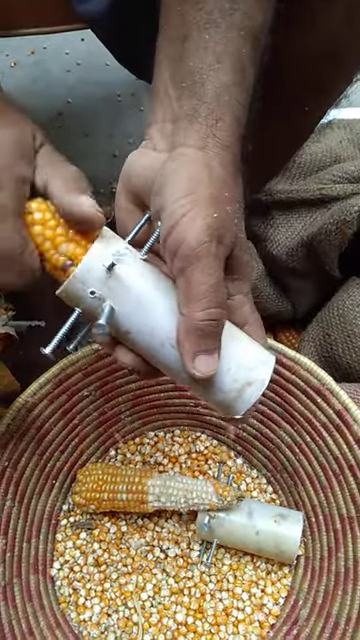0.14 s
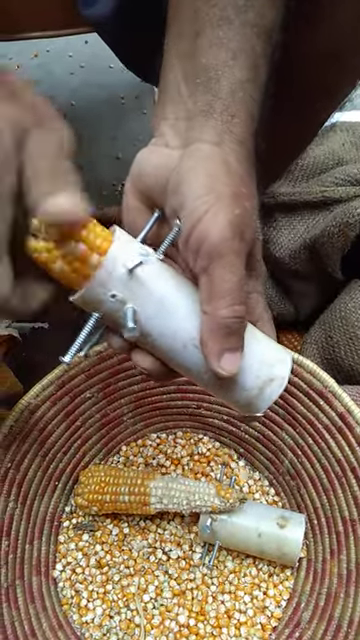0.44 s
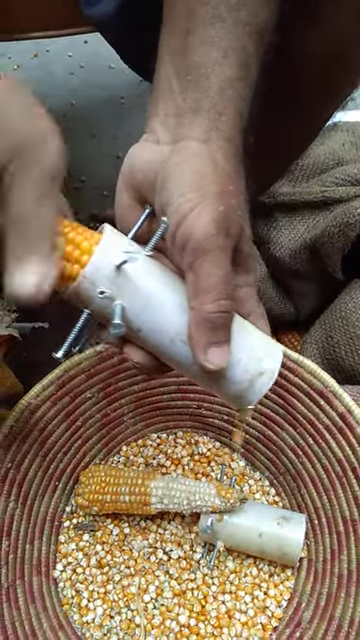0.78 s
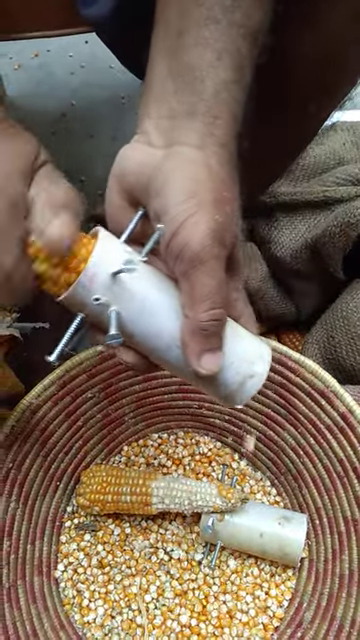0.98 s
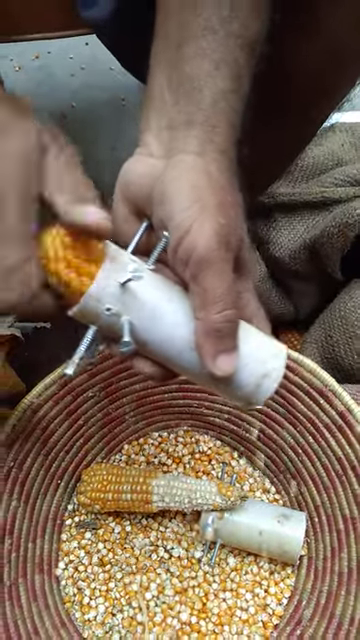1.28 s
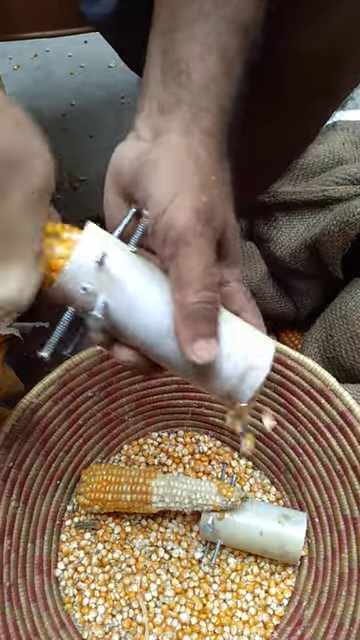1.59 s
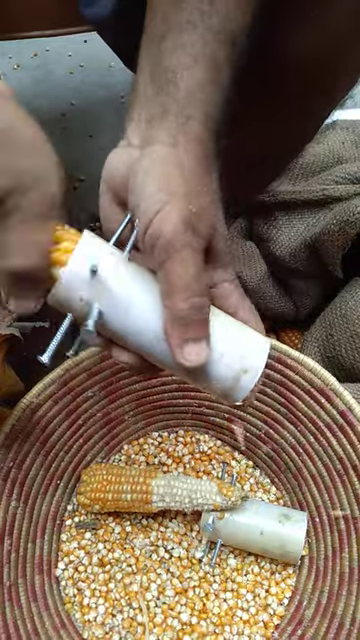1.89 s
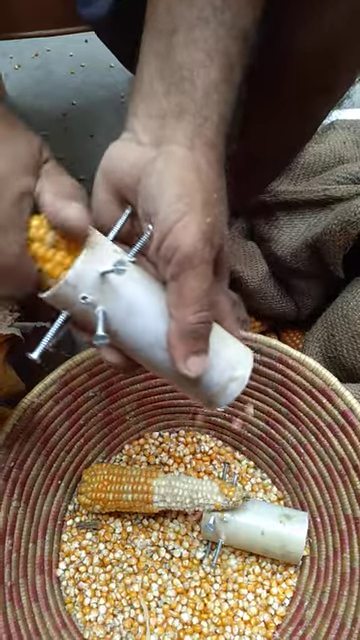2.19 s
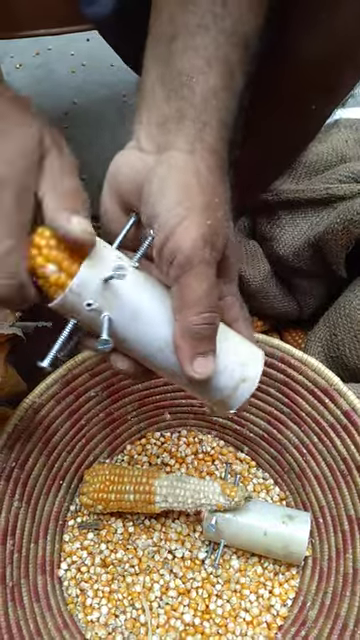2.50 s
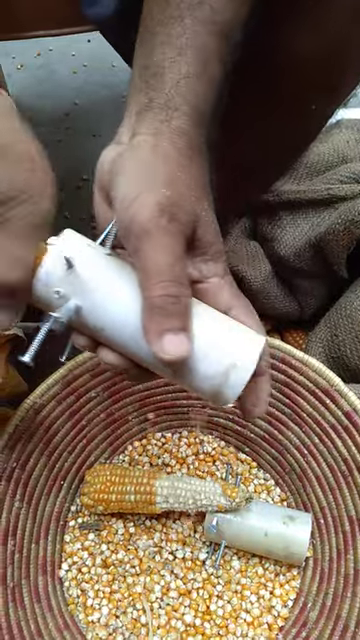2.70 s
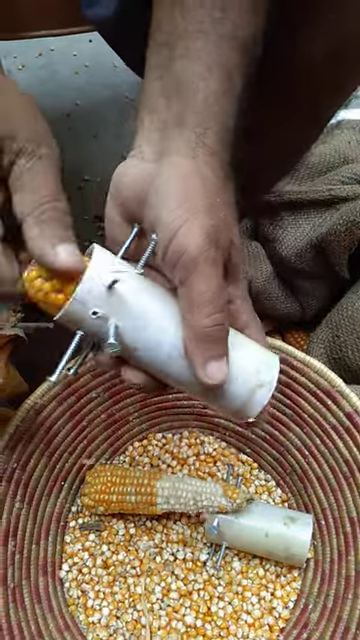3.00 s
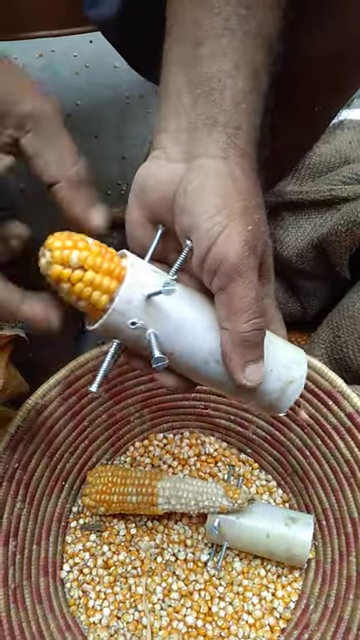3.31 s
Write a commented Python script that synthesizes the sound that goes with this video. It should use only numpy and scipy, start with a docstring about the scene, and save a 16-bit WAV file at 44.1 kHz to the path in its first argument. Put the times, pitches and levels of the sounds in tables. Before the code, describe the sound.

Dry corn kernels snap off a cob wrung in short twists through a plastic pipe with nails; crunches, bright ticks, small metallic pings and soft basket plops, close microphone, small room.

```python
"""A rustle and a faint, sagging low tone come first, then kernels crack off a dry corn cob, close to the microphone.
The cob is wrung in short twists through a plastic pipe studded with nails, in a small room.
Snaps, ticks and basket plops are noise bursts, the crunch and rustle are random grains with hiss,
and the pinging nails, low tone and late thin whistle are sines. Resonances colour snaps, ticks and crunch."""
import sys
import numpy as np
from scipy import signal
from scipy.fft import rfft, irfft
from scipy.io import wavfile
from scipy.ndimage import uniform_filter1d

SR = 44100
rng = np.random.default_rng(int(sys.argv[2]) if len(sys.argv) > 2 else 0)


def int16_out(signal):
    """Quantize to a 16-bit WAV file."""
    q = np.round(np.clip(np.atleast_2d(signal).T, -1, 1) * 32767)
    wavfile.write(sys.argv[1], SR, q.astype(np.int16))


N = 152145

# spectrum of dry corn against the nails, for crunch and ticks: frequency_hz, level_db
CRUNCH_COLOUR = [(50, -64.5), (220, -19), (480, -22), (850, -16), (1700, -12.5), (3300, -3.5), (5700, -2),
                 (8500, 2.5), (11000, -1.5), (15500, -5.5)]
# edges of the neighbouring bands for grains and room: edge_hz
BAND_EDGES_HZ = (30, 400, 900, 1350, 2300, 3500, 5000, 7000, 9500, 12500, 19000)
HIT_SIZE = 2048   # samples in one short sound


def from_db(db):
    """Decibels to gain."""
    return 10 ** (np.asarray(db) / 20)


def rms_one(x):
    """Scale to unit rms."""
    return x / np.sqrt(np.mean(x ** 2) + 1e-20)


def add(out, s, sound):
    """Mix a short sound in at a given time in seconds."""
    start = max(int(s * SR), 0)
    out[start:start + len(sound)] += sound[:max(len(out) - start, 0)]


def band(x, low_hz, high_hz):
    """Band-pass."""
    return signal.sosfilt(signal.butter(3, [low_hz, high_hz], "band", fs=SR, output="sos"), x)


def coloured(x, colour):
    """Causal (minimum-phase) filter with the given spectrum, along the last axis."""
    hz, db = np.transpose(colour)
    grid = np.maximum(np.arange(HIT_SIZE // 2 + 1) * SR / HIT_SIZE, 1)
    gain = from_db(np.interp(np.log(grid), np.log(hz), db))
    # folding the cepstrum onto positive time gives the minimum phase
    cepstrum = irfft(np.log(gain))
    cepstrum[1:HIT_SIZE // 2] *= 2
    cepstrum[HIT_SIZE // 2 + 1:] = 0
    kernel = irfft(np.exp(rfft(cepstrum)))
    if x.ndim > 1:
        kernel = kernel[None]
    return signal.fftconvolve(x, kernel, axes=-1)[..., :x.shape[-1]]


def resonate(x, modes):
    """The plain sound plus the two-pole resonances that it excites."""
    out = x
    for hz, width_hz, db in modes:
        r = np.exp(-np.pi * width_hz / SR)
        poles = [1, -2 * r * np.cos(2 * np.pi * hz / SR), r * r]
        ringing = signal.lfilter([1, 0, -1], poles, x)
        out = out + from_db(db) * (1 - r * r) / 2 * ringing
    return out


def fractures(count, decay_s):
    """One row per hit: a sharp crack and a quickly dying splintering, both of noise."""
    crack_decay_s, crack_db = 0.00072, 3.5
    t = np.arange(HIT_SIZE) / SR
    envelope = np.exp(-t / decay_s) + from_db(crack_db) * np.exp(-t / crack_decay_s)
    return rng.standard_normal((count, HIT_SIZE)) * envelope


def kernel_hits(count, decay_s):
    """Fractures coloured by the short resonances of each kernel, no two alike."""
    # a kernel rings once between each neighbouring pair: edge_hz
    pitch_edges = np.array((2500, 5130, 6790, 13110))
    width_hz, ring_db = 620, 2.5
    pitches = pitch_edges[:-1] + np.diff(pitch_edges) * rng.random((count, len(pitch_edges) - 1))
    hits = []
    for hit, own_pitches in zip(fractures(count, decay_s), pitches):
        hits.append(resonate(hit, [(hz, width_hz, ring_db) for hz in own_pitches]))
    return np.array(hits)


def placed(times, levels_db, hits):
    """Lay the hits out in time; a level is the hit's energy spread over 5 ms."""
    out = np.zeros(N)
    for s, db, hit in zip(times, levels_db, hits):
        add(out, s, from_db(db) * hit * np.sqrt(.005 * SR / np.sum(hit ** 2)))
    return out


def crackle(per_s, spread_db):
    """Random tiny fractures, each with its own size and colour, evened over about 20 ms."""
    grain_decay_s, patchy_db = 0.003, 5.5   # each grain's bands differ by up to this, either way
    starts = rng.random(N) < per_s / SR
    sizes_db = spread_db * np.minimum(rng.exponential(1, N), 3)
    energy = starts * from_db(sizes_db) ** 2 + 1e-9
    dying = [1, -np.exp(-2 / (grain_decay_s * SR))]
    usual = uniform_filter1d(signal.lfilter([1], dying, energy), size=900)
    out = 0
    for low_hz, high_hz in zip(BAND_EDGES_HZ, BAND_EDGES_HZ[1:]):
        patchiness = from_db(patchy_db * 2 * (rng.random(N) - .5)) ** 2
        power = signal.lfilter([1], dying, energy * patchiness)
        evened = np.sqrt(power / (usual + 0.61 * usual.mean()))
        out = out + band(rng.standard_normal(N) * evened, low_hz, high_hz)
    return rms_one(out)


def room(x):
    """A short, diffuse tail: in each band the energy lingers in noise and dies away."""
    # spectrum of the tail: frequency_hz, level_db
    room_colour = [(500, -2.5), (1700, -3), (3200, -0.5), (9000, -4.5), (15500, -4)]
    room_db, t60_s = -10, 0.3
    t = np.arange(SR // 2) / SR
    decay = from_db(-60 * t / t60_s) ** 2
    out = 0
    for low_hz, high_hz in zip(BAND_EDGES_HZ, BAND_EDGES_HZ[1:]):
        energy = signal.fftconvolve(band(x, low_hz, high_hz) ** 2, decay / decay.sum())[:N]
        noise = rms_one(band(rng.standard_normal(N), low_hz, high_hz))
        out = out + np.sqrt(np.abs(energy)) * noise
    return from_db(room_db) * coloured(out, room_colour)


def whistle():
    """A thin, faint sine wavers in pitch, flickers in level and glides upward in the background."""
    # course of the whistle: time_s, pitch_hz, level_db
    whistle_course = [(3.285, 1390, -71), (3.321, 1375, -56), (3.45, 1496, -54)]
    waver_hz, flicker_db = 55, 4   # rms
    s, hz, db = np.transpose(whistle_course)
    t = np.arange(N) / SR
    waver, flicker = rms_one(band(rng.standard_normal((2, N)), 17, 110))
    pitch = np.interp(t, s, hz) + waver_hz * waver
    level = from_db(np.interp(t, s, db) + flicker_db * flicker)
    return (t > s[0]) * level * np.sqrt(2) * np.sin(2 * np.pi * np.cumsum(pitch) / SR)


def groan():
    """A soft, low sine sags in pitch and fades at the start."""
    start_hz, sag_hz_per_s, level_db, t60_s = 216, 1700, -56, 0.25
    t = np.arange(SR // 4) / SR
    pitch = np.maximum(start_hz - sag_hz_per_s * t, 0)
    level = from_db(level_db - 60 * t / t60_s)
    out = np.zeros(N)
    add(out, 0, level * np.sin(2 * np.pi * np.cumsum(pitch) / SR))
    return out


def rustle():
    """Fingers and husk on the pipe keep up a faint crackling hiss of grains and steady noise."""
    # loudness of the rustle: time_s, level_db
    rustle_levels = [(0, -40), (.15, -47), (.45, -42.5), (.85, -44.5), (.97, -53), (1.662, -43),
                     (1.72, -55), (2.08, -45.5), (2.5, -45.5), (2.85, -51.5), (3.45, -54.5)]
    # spectrum of the rustle: frequency_hz, level_db
    rustle_colour = [(40, -31), (110, -19.5), (240, -16.5), (500, -1), (1600, -1.5), (3600, 0.5),
                     (9000, 0.5), (15500, -3.5)]
    grains_per_s, spread_db, hiss_db = 300, 8, -7   # hiss relative to the grains
    grains = crackle(grains_per_s, spread_db) + from_db(hiss_db) * rng.standard_normal(N)
    level = from_db(np.interp(np.arange(N) / SR, *np.transpose(rustle_levels)))
    return level * rms_one(coloured(grains, rustle_colour))


def plops():
    """Kernels land softly on the heap in the woven basket: noise bursts, each with its own top."""
    # landings, dull and bright: start_s, level_db (before the trim), top_hz
    landing_events = [(0.111, -49, 3000), (0.172, -57.5, 1000), (0.217, -52.5, 1000), (0.566, -48.5, 3000),
                      (0.576, -54, 2500), (0.613, -48, 2320), (1.109, -47.5, 4060), (2.503, -53.5, 2300),
                      (3.385, -45.5, 2400)]
    # spectrum of a landing: frequency_hz, level_db
    plop_colour = [(200, -30.5), (450, -5.5), (700, -2.5), (1000, -11), (1800, -1), (3000, -14.5)]
    trim_db, decay_s = 9.5, 0.0048
    s, db, top_hz = np.transpose(landing_events)
    landings = coloured(fractures(len(s), decay_s), plop_colour)
    dulled = [band(hit, 150, hz) for hit, hz in zip(landings, top_hz)]
    return placed(s, db + trim_db, dulled)


def pings():
    """A flicked nail rings briefly on one high note, a fast-dying sine."""
    # flicked nails: start_s, level_db (before trim and envelope), pitch_hz
    flicks = [(.087, -24, 8270), (0.227, -17.5, 8120), (0.61, -16, 8120), (0.6397, -11, 8480),
              (2.0067, -14, 8210), (2.2184, -19, 8100), (2.2338, -15.5, 8180), (3.063, -7.5, 8150)]
    trim_db, t60_s, attack_s = -4, 0.024, 0.00029
    out, t = np.zeros(N), np.arange(HIT_SIZE) / SR
    for s, db, hz in flicks:
        envelope = from_db(db + trim_db - 60 * t / t60_s) * (1 - np.exp(-t / attack_s))
        add(out, s, envelope * 2 * np.sin(2 * np.pi * hz * t))
    return out


def ticks():
    """Loose kernels strike pipe and nails: lighter and shorter than snaps."""
    # loose kernels: start_s, treble_db, middle_db (levels before the trim)
    strikes = [(0.111, -49, -38.5), (0.427, -30.5, -39), (0.508, -34, -39), (0.53, -29, -50),
               (0.619, -32, -34), (0.626, -26, -48), (0.6757, -22, -29), (0.81, -28, -42.5),
               (0.8425, -32.5, -44.5), (1.2353, -26, -36.5), (1.293, -36.5, -44), (1.418, -32, -38),
               (1.514, -23.5, -27.5), (1.6073, -32.5, -48), (1.668, -39.5, -43), (1.8228, -32, -31.5),
               (1.873, -24, -37.5), (2.086, -31, -40.5), (2.143, -40, -47), (2.215, -26.5, -30.5),
               (2.247, -22.5, -38), (2.256, -39, -39), (2.308, -32, -32), (2.454, -31, -60),
               (2.969, -54, -49), (3.022, -38.5, -46.5), (3.042, -51, -42.5), (3.053, -26, -40.5),
               (3.156, -25, -37.5), (3.296, -42, -41.5), (3.386, -46, -41), (3.426, -41, -39.5)]
    trim_db, decay_s = 2.5, 0.0027
    s, treble_db, middle_db = np.transpose(strikes)
    clicks = coloured(kernel_hits(len(s), decay_s), CRUNCH_COLOUR)
    treble = placed(s, treble_db + trim_db, band(clicks, 9500, 21168))
    middle = placed(s, middle_db + trim_db, band(clicks, 690, 6260))
    return treble + middle


def twist_force():
    """The hand takes hold with a soft creak, wrings the cob steadily and lets go."""
    # twists, sudden slips and slides of the cob: start_s, end_s, force_db
    wrings = [(-0.006, 0.014, -42), (0.262, 0.32, -43.5), (0.301, 0.336, -27), (0.683, 0.753, -30.5),
              (1.142, 1.183, -35), (1.465, 1.575, -35), (1.854, 1.835, -28), (1.923, 1.993, -31),
              (2.293, 2.416, -37), (2.684, 2.73, -37), (2.768, 2.777, -29.5), (3.129, 3.201, -42),
              (3.216, 3.308, -48.5)]
    attack_s, release_s = 0.0042, 0.012
    grip_s, grip_db = 0.057, -21.5   # rise time of the hold, and its force relative to the wring
    t, force = np.arange(N) / SR, np.zeros(N)
    for start, end, db in wrings:
        grip = from_db(grip_db) * np.exp(np.minimum(t - start, 0) / grip_s)
        wring = np.clip((t - start) / attack_s, 0, 1)
        release = np.exp(-np.maximum(t - end, 0) / release_s)
        force += from_db(db) * np.maximum(grip, wring) * release
    return force


def in_pipe(x):
    """The pipe's air column resonates, its pitch shifting a little as its mouth is covered more or less."""
    # air-column resonances: pitch_hz, width_hz, gain_db over the plain sound
    pipe_modes = [(613, 109, 16), (1056, 69, 19.1), (1958, 22, 11.5)]
    wander = .009   # rms share of the pitch
    speed = 1 + wander * rms_one(band(rng.standard_normal(N), 3, 11.58))
    ringing = resonate(x, pipe_modes) - x
    return np.interp(np.cumsum(speed), np.arange(N), ringing) + x


def crunch():
    """The cob grinds over the nails: dense crackle and rubbing, heard through the pipe's air column."""
    grains_per_s, spread_db = 450, 7.5
    crunch_db, rub_db = 7, -10   # crunch over the twist force, rubbing relative to the grains
    force = twist_force()
    grinding = crackle(grains_per_s, spread_db) + from_db(rub_db) * rng.standard_normal(N)
    sound = coloured(force * in_pipe(grinding), CRUNCH_COLOUR)
    return from_db(crunch_db) * rms_one(sound) * np.sqrt(np.mean(force ** 2))


def snaps():
    """Each kernel breaks off with a crack that rings the nails and a thump through the cob."""
    # kernels snapping off: start_s, crack_treble_db, knock_middle_db, thump_low_db (before the trims)
    breaks = [(0.236, -13, -30, -39), (0.238, -17, -25, -65), (0.308, -19, -21.5, -32),
              (0.3184, -13.5, -42, -52), (0.3314, -14, -27, -40.5), (0.343, -21, -27, -38),
              (0.3556, -23, -25, -58), (0.366, -23, -28, -45), (0.4799, -14.5, -28, -43),
              (0.723, -20, -26, -48), (0.753, -19.5, -32, -42), (0.9007, -15.5, -27, -43),
              (0.994, -12.5, -27.5, -48.5), (1.0246, -17, -29, -54), (1.152, -21.5, -27, -66),
              (1.1801, -16, -22, -45), (1.348, -15, -25.5, -60), (1.3602, -13.5, -24.5, -36.5),
              (1.4487, -11.5, -30.5, -38), (1.473, -33, -25.5, -51), (1.4818, -25, -24.5, -40),
              (1.5719, -20.5, -29.5, -41.5), (1.831, -14.5, -22.5, -30.5), (1.8393, -14, -25.5, -52),
              (1.892, -20.5, -35.5, -74), (1.9928, -20.5, -30.5, -38.5), (2.3759, -23.5, -29, -44),
              (2.3791, -17, -19.5, -50), (2.5867, -19.5, -24, -45.5), (2.737, -24, -25, -47),
              (2.7799, -18, -23.5, -41.5), (2.8098, -17, -25, -48)]
    # nail resonances: pitch_hz, width_hz, gain_db over the plain click
    nail_modes = [(5085, 89, 6.5), (8050, 240, -0.5), (9100, 1600, -8)]
    # spectra of crack and thump: frequency_hz, level_db
    snap_colour = [(300, -12.5), (700, -17.5), (1800, -13.5), (3200, -13), (4700, -7), (7400, -10.5),
                   (8500, -3), (10900, -9.5), (11900, -7.5), (15500, -12)]
    thump_colour = [(35, -11), (160, 0.5), (500, 0)]
    crack_trim_db, knock_trim_db, thump_trim_db = 3, 2.5, -4
    snap_decay_s, thump_decay_s = 0.0042, 0.004
    s, treble_db, middle_db, low_db = np.transpose(breaks)
    cracks = coloured(resonate(kernel_hits(len(s), snap_decay_s), nail_modes), snap_colour)
    jolts = fractures(len(s), thump_decay_s)
    jolts[:, 0] += np.sqrt(np.sum(jolts ** 2, axis=1)) * 2   # the sudden release is one clean push
    thumps = band(coloured(jolts, thump_colour), 22, 530)
    treble = placed(s, treble_db + crack_trim_db, band(cracks, 9950, 21168))
    middle = placed(s, middle_db + knock_trim_db, band(cracks, 440, 8100))
    low = placed(s, low_db + thump_trim_db, thumps)
    return treble + middle + low


def scene():
    """The shelling and its room, with the pings weaker in the room and the rustle left dry."""
    ping_room_db = -19
    shelling = snaps() + ticks() + plops() + crunch() + groan() + whistle()
    nails = pings()
    tail = room(shelling + from_db(ping_room_db) * nails)
    return (shelling + nails + tail + rustle())[None]


def record(dry):
    """The highest peaks are rounded and the top is cut."""
    cutoff_hz = 15900
    rounded = 1.3 * np.tanh(dry / 1.3)
    return signal.sosfilt(signal.ellip(10, .2, 70, cutoff_hz, fs=SR, output="sos"), rounded)


dry = scene()
out = record(dry)
int16_out(out)
```